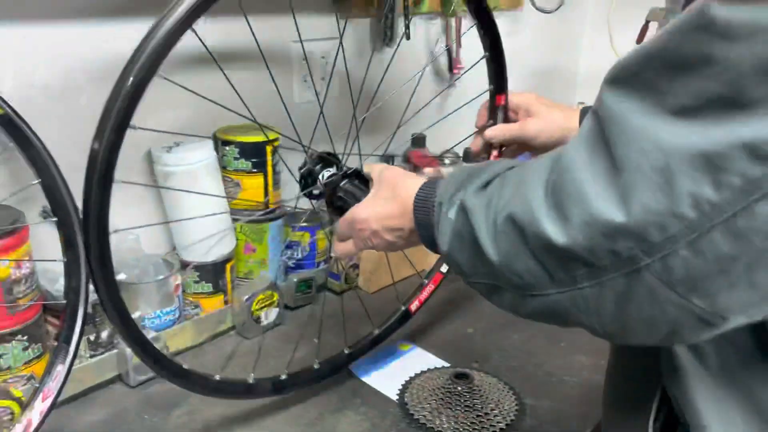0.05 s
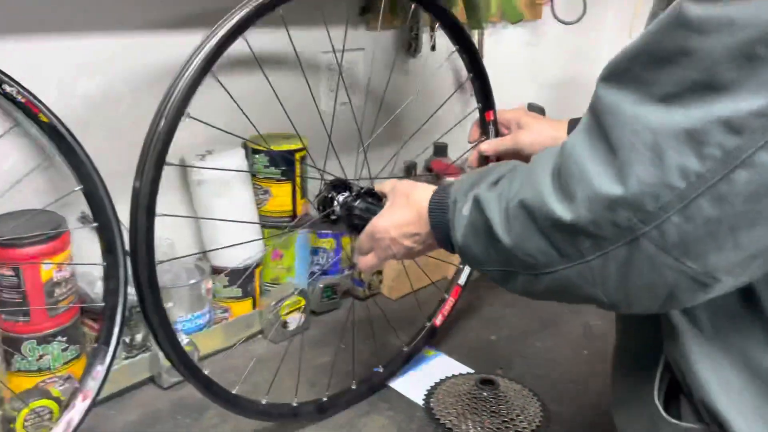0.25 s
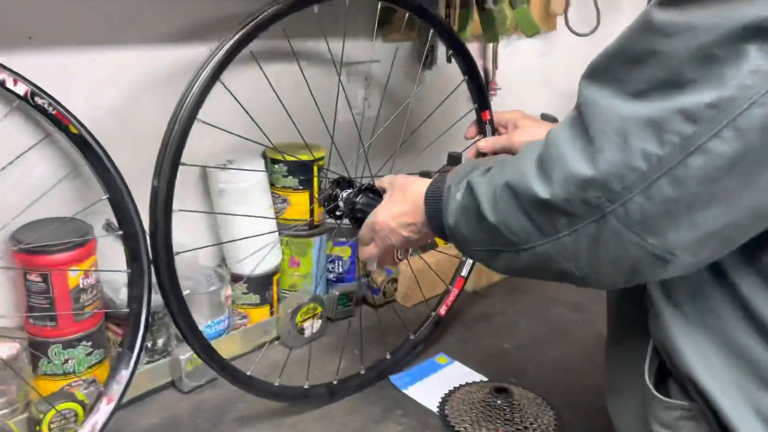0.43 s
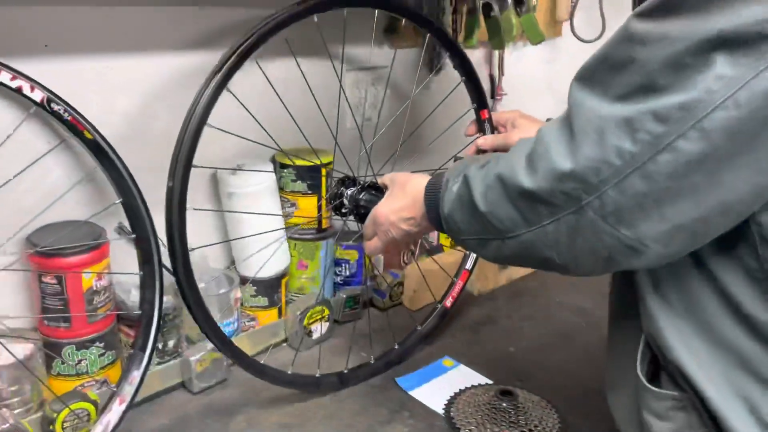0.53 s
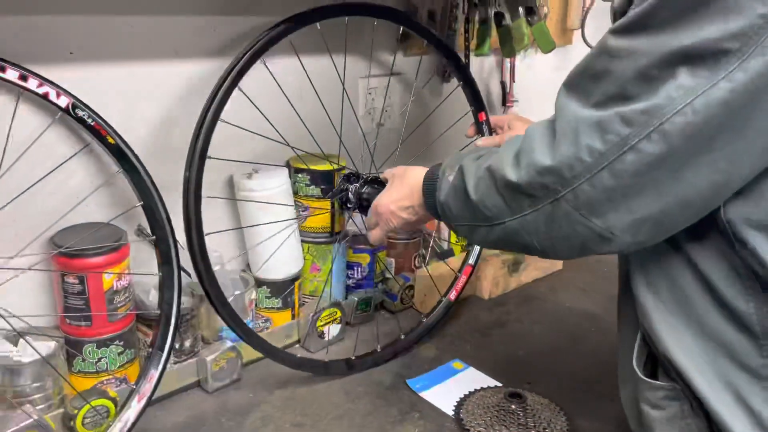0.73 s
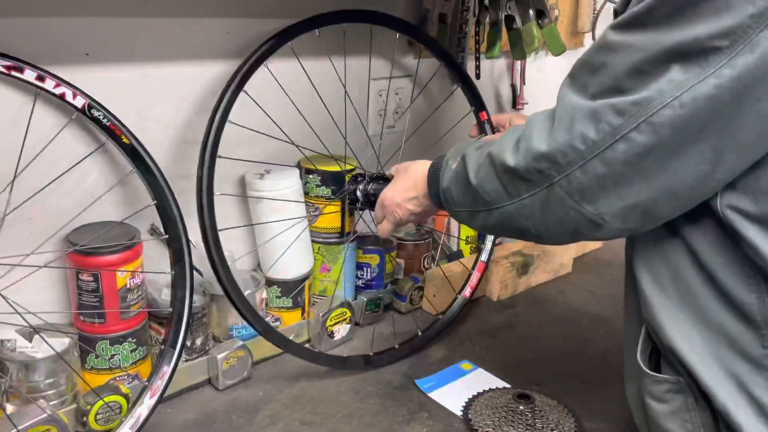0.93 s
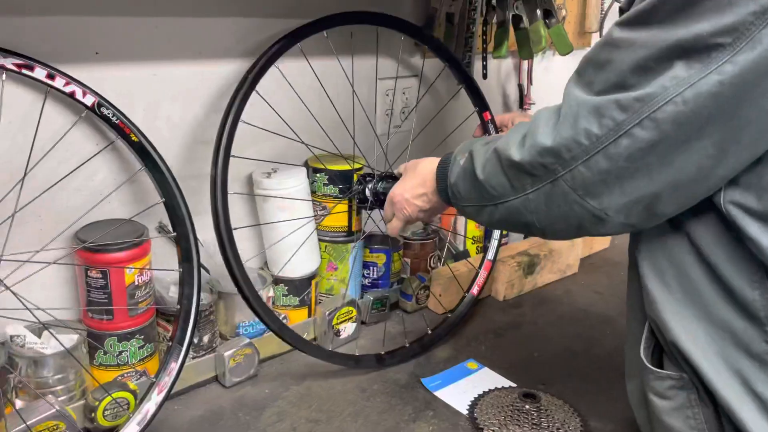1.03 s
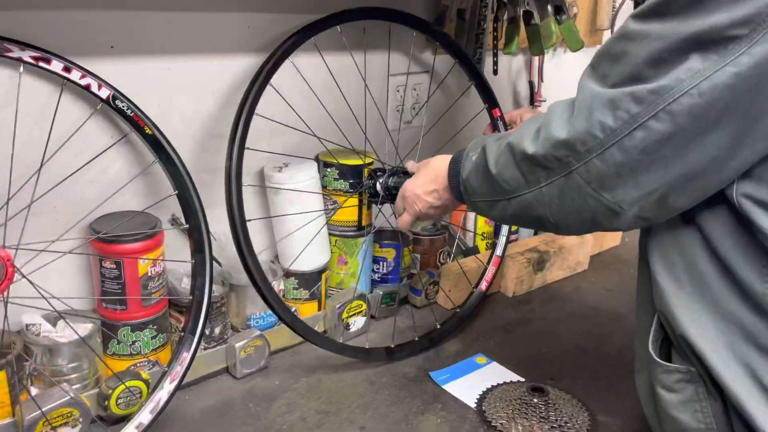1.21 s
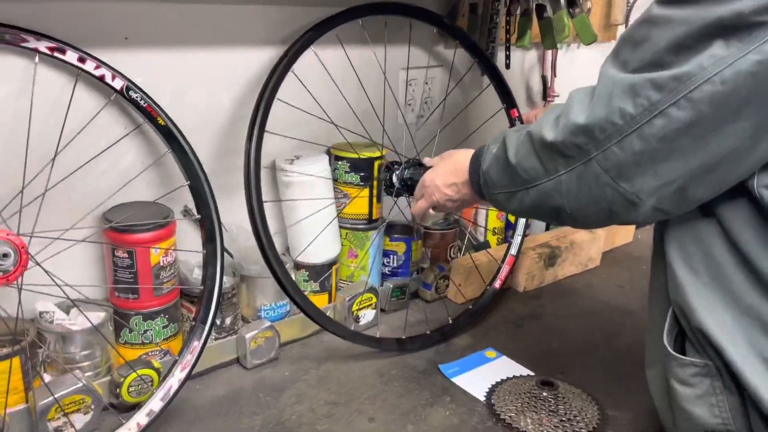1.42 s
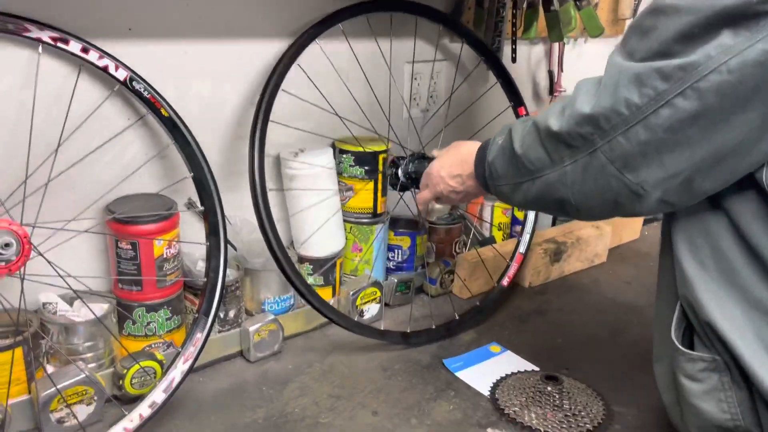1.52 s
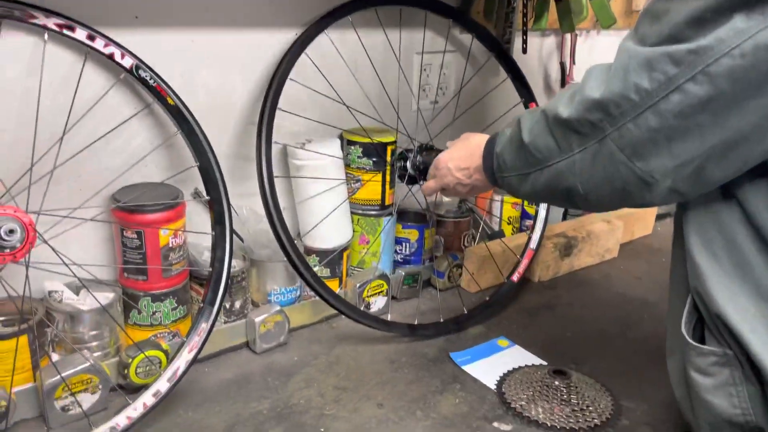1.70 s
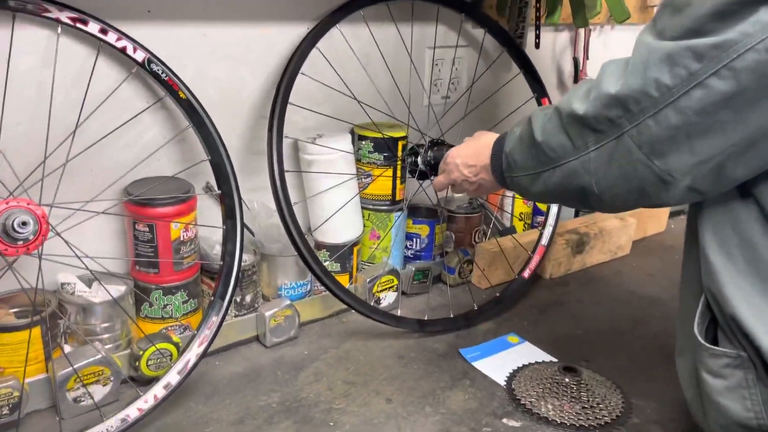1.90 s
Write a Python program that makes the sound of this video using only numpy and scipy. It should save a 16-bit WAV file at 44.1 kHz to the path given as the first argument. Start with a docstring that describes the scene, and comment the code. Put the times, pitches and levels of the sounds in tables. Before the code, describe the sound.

A bicycle wheel thuds loudly onto a cluttered workbench, bumps again more softly, scrapes and rattles along with small metal ticks, pauses, then gets a few light knocks; close microphone in a small, quiet workshop.

```python
"""In a small workshop, a sleeve rustles while a spoked bicycle wheel is lowered onto a cluttered workbench.
The wheel lands, bumps the bench again and is pushed along it; after a pause it is nudged and knocks lightly.
Fading tones make the booms, metal rings, low thuds and hums; shaped noise makes the clacks, cracks and rustle.
Thousands of random slips scrape the rim, and tiny pings chatter along with it.
A short room tail and quiet air surround it all."""
import sys
import numpy as np
from scipy import signal
from scipy.fft import rfft, irfft, next_fast_len
from scipy.io import wavfile
from scipy.ndimage import map_coordinates

SR = 44100
rng = np.random.default_rng(int(sys.argv[2]) if len(sys.argv) > 2 else 0)


def pcm_store(signal):
    """Save signal as 16-bit PCM."""
    levels = np.round(np.clip(np.atleast_2d(signal), -1, 1) * 32767)
    wavfile.write(sys.argv[1], SR, levels.astype(np.int16).T)


N = 85995  # length in samples

# In all tables and settings, T60 is the time in seconds to fade by 60 dB.
# Noise colours give relative levels only: the noise is brought to an even loudness afterwards.

# The rim knocks on the bench. Each row: start in seconds, boom level in dB, boom pitch as a ratio,
# boom lag in seconds, clack level in dB, crack level in dB.
RIM_KNOCKS = [(0.2274, -18.5, 1.7, 0.00052, -15.5, -50), (0.2339, -3.5, 1.0, 0, -15.5, -42),
              (0.5451, -12.5, 1.01, 0.0037, -27.5, -42.5), (0.922, -30, 0.89, 0, -65, -66),
              (0.967, -26, 1.05, 0.00077, -42.5, -53.5), (1.462, -31, 0.94, 0.0032, -58.5, -65),
              (1.512, -33, 0.43, 0, -40.5, -52.5), (1.5909, -44.5, 1.5, 0, -34, -43),
              (1.605, -26.5, 0.8, 0.011, -31, -50.5)]
# Low tones of the bench top. Each row: pitch in Hz before the knock's ratio, relative level in dB, T60 in seconds.
BENCH_MODES = [(61.6, -27.5, 0.34), (92.3, -11, 0.16), (122.65, 4, 0.13), (189, -18, 0.12),
               (260, -14, 0.18), (316, -17, 0.24), (406.6, -19, 0.18), (844.6, -35, 0.11),
               (901, -19, 0.055), (958.7, -22, 0.049), (1579, -34.5, 0.22)]
# Colour of the clack of rim and clutter. Each row: frequency in Hz, relative level in dB per Hz.
CLACK_COLOUR = [(30, -21.5), (70, -9), (150, 2.5), (380, -0.5), (520, -10.5), (950, -10), (1700, -19),
                (2600, -25.5), (4500, -30.5), (8000, -68.5), (16000, -88)]
# Peaks in the clack. Each row: frequency in Hz, width in Hz, relative level in dB.
CLACK_RESONANCES = [(421.5, 30, -2), (919, 33, 0), (1597, 90, 5), (1860, 90, -2.5)]
# How long the clack lasts. Each row: frequency in Hz, T60 in seconds.
CLACK_FADE = [(60, 0.15), (300, 0.16), (1000, 0.13), (3000, 0.14), (12000, 0.067)]
# Colour of the sharp crack. Each row: frequency in Hz, relative level in dB per Hz.
CRACK_COLOUR = [(300, -58), (1500, -6), (3500, 1), (6500, 0), (8500, -0.5), (12500, 0), (16000, -19)]
# Resonances of the rim and hub. Each row: frequency in Hz, width in Hz, level in dB over the plain noise.
RIM_RESONANCES = [(642, 8.3, -5.5), (1298, 63, 7.5), (1805, 53, 12.5), (1967, 22, 12), (2520, 98, 3.5),
                  (2870, 71.6, 4), (3107, 25, 10), (3467, 50, -7.5), (3760, 270, -1.5), (4320, 139.4, 1),
                  (4970, 30, 8), (6320, 30, 13), (6820, 50, 7.5)]
# The rim scrapes along the bench. Each row: time in seconds, level in dB.
SLIDE_LEVEL = [(0.2, -74.5), (0.37, -60.5), (0.54, -55.5), (0.56, -39.5), (0.635, -36.5), (0.66, -41),
               (0.72, -42.5), (0.85, -48), (0.9, -45), (0.99, -46.5), (1.04, -57.5), (1.13, -106),
               (1.31, -84), (1.36, -57), (1.39, -61), (1.42, -54), (1.47, -49), (1.5, -54), (1.58, -55.5),
               (1.66, -57), (1.78, -90)]
# Colour of the scrape. Each row: frequency in Hz, relative level in dB per Hz.
SCRAPE_COLOUR = [(200, 6.5), (400, 11.5), (700, 4), (1800, -6.5), (3500, -6.5), (6500, -14), (8500, -10),
                 (10500, -10), (12800, -12), (16000, -26)]
# The bench rumbles under the moving wheel. Each row: time in seconds, level in dB.
RUMBLE_LEVEL = [(0.24, -100), (0.3, -41), (0.4, -42), (0.52, -57.5), (0.6, -30), (0.72, -32), (0.86, -48),
                (0.99, -35), (1.1, -55.5), (1.3, -66), (1.39, -61), (1.46, -43), (1.57, -51.5),
                (1.63, -46.5), (1.72, -55), (1.95, -67)]
# Colour of the rumble. Each row: frequency in Hz, relative level in dB per Hz.
RUMBLE_COLOUR = [(25, -28), (55, 4), (75, -2.5), (120, 5), (170, -4), (280, -9), (400, -11.5), (520, -25.5),
                 (1000, -53)]
# Small metal parts tick. Each row: start in seconds, level in dB, T60 of the hiss in seconds.
METAL_TICKS = [(0.546, -33, 0.028), (0.5777, -41.5, 0.11), (0.5926, -38.5, 0.035), (0.628, -43, 0.028),
               (0.672, -45.5, 0.077), (0.7178, -37.5, .06), (0.7632, -45.5, 0.21), (0.8994, -33, 0.073),
               (0.9656, -52, 0.11), (1.458, -51, 0.091), (1.514, -57.5, .08), (1.5932, -45, 0.081)]
# Tones of the small metal parts. Each row: pitch in Hz, relative level in dB, T60 in seconds.
METAL_MODES = [(3085, -9, .2), (3693, -9, .14), (4945, -8, .17), (6233, -3, .13), (6815, -11, .13),
               (9426, -11, .14), (11950, -5, .09), (12930, -2, .09), (13460, 0, .08), (13840, -1, .09)]
# Colour of the hiss in a tick. Each row: frequency in Hz, relative level in dB per Hz.
TICK_COLOUR = [(1000, -25), (2500, 1), (4000, 2), (8000, -8), (10500, -2.5), (13300, 2.5), (16000, -9)]
# Low thuds of the swaying bench and hums of the wheel and spokes.
# Each row: start in seconds, pitch in Hz, level in dB, T60 in seconds.
THUDS_AND_HUMS = [(0.236, 343, -34.5, 0.63), (0.551, 264.5, -36, 0.41), (0.971, 303, -51, 1.17),
                  (1.001, 421.7, -57.5, 1.31), (1.01, 42.7, -33.5, 0.45), (1.601, 84.6, -41.5, 0.67),
                  (1.601, 54.7, -41.5, 1.3), (1.621, 284, -55, 1.6), (1.6, 414, -51.5, 0.45)]
# The sleeve rustles while the wheel is lowered. Each row: time in seconds, level in dB.
SLEEVE_LEVEL = [(0, -66), (0.08, -63.5), (0.2, -61.5), (0.3, -76.5)]
# Colour of the cloth. Each row: frequency in Hz, relative level in dB per Hz.
CLOTH_COLOUR = [(150, 9), (400, -13), (540, 2), (800, -1), (2200, -3.5), (3800, -13.5), (7000, -21),
                (8500, -28.5), (12000, -37), (16000, -37)]
# Colour of the tick as the grip shifts. Each row: frequency in Hz, relative level in dB per Hz.
HAND_TICK_COLOUR = [(1000, -20), (2800, -19.5), (3800, -4.5), (5000, -16.5), (9000, -32)]
# Colour of the room's tail. Each row: frequency in Hz, relative level in dB per Hz.
TAIL_COLOUR = [(150, -57.5), (450, 6), (1000, 2.5), (4000, 1.5), (14000, -9.5)]
# Colour of the room air. Each row: frequency in Hz, relative level in dB per Hz.
AIR_COLOUR = [(25, -1.5), (60, 6.5), (110, -6.5), (180, -17.5), (330, -2), (700, -20.5), (2000, -24),
              (5000, -26), (8500, -23.5), (12500, -17.5), (16000, -62.5)]
# Stereo width. Each row: frequency in Hz, side level over middle level in dB.
STEREO_WIDTH = [(60, -16), (125, -11.5), (250, -8), (500, -6), (1000, -4), (4000, -2), (7000, -0.5),
                (8700, 20), (10200, 0), (11500, 3.5), (16000, -98)]
# Lean of the whole scene. Each row: frequency in Hz, left level over right level in dB.
LEFT_LEAN = [(30, -1), (60, 0.5), (125, 2.5), (250, 2), (500, 2), (1000, 1.5), (2500, 0.66), (12000, -0.5)]

BOOM_RISE_S, CLACK_RISE_S, CRACK_RISE_S, CRACK_T60 = 0.012, 0.0033, 0.00033, 0.18
GRAINS_PER_S, GRAIN_SPREAD_DB, SCRAPE_ROUGH_DB = 5000, -1, 0.5
CHATTER_DB, CHATTER_SPREAD_DB, CHATTER_T60 = -12, 4.5, 0.065  # level is relative to the slide
CHATTER_LOW_HZ, CHATTER_HIGH_HZ = 895, 5550
TICK_RING_DB, TICK_NOISE_DB = -10.5, -2  # relative to each tick's level
HUM_RISE_S, HUM_WAVER_DB = 0.0059, 2  # for the thuds as well
HAND_TICK_S, HAND_TICK_DB = 0.088, -58.5
ROOM_T60, ROOM_DB, AIR_DB = 0.29, -12, -73.5
LEFT_LEAD_S = 0.00007  # for low tones; it shrinks as pitch rises
LOW_CUT_HZ, TOP_HZ = 47, 15900


def amp(db):
    """Turn decibels into a gain."""
    return 10 ** (np.asarray(db) / 20)


def unit(x):
    """Scale a sound to an average (rms) strength of 1."""
    return x / np.sqrt(np.mean(x ** 2) + 1e-20)


def along(points, hz):
    """Read a table of (Hz, value) at any frequency, on a log axis."""
    table_hz, values = np.transpose(points)
    return np.interp(np.log(hz + 1), np.log(table_hz + 1), values)


def curve(rows):
    """Join (seconds, value) points into one value per sample."""
    return np.interp(np.arange(N) / SR, *np.transpose(rows))


def since(s):
    """Seconds passed after a moment, zero before it."""
    return np.maximum(np.arange(N) / SR - s, 0)


def rise(t, seconds):
    """A gain that climbs smoothly from 0 towards 1."""
    return 1 - np.exp(-t / seconds)


def wobble(rate):
    """A smooth random curve through `rate` random points a second."""
    knots = rng.standard_normal(int(N * rate / SR) + 4)
    return map_coordinates(knots, [np.arange(N) * rate / SR])


def filtered(x, response):
    """Reshape a sound by a gain for each frequency."""
    m = next_fast_len(N + SR // 2)
    spectrum = rfft(x, m) * response(np.fft.rfftfreq(m, 1 / SR))
    return irfft(spectrum, m)[..., :N]


def noise(colour, drive=1, peaks=()):
    """Coloured stereo noise of rms 1: a resonance lifts each peak, and the width table spreads it."""
    def response(hz):
        turn = np.arctan(amp(along(STEREO_WIDTH, hz)))
        body = 1
        for centre, width, db in peaks:
            body = body + amp(db) / (1 + 2j * (hz - centre) / width)
        return body * amp(along(colour, hz)) * np.array([np.cos(turn), np.sin(turn)])
    mid, side = filtered(drive * rng.standard_normal((2, N)), response)
    return unit(np.array([mid + side, mid - side]))


def boom(s, pitch):
    """The bench top swells into its low tones, which then fade at their own speeds."""
    t = since(s)
    swell = np.sin(np.pi / 2 * np.minimum(t / BOOM_RISE_S, 1)) ** 2
    tones = 0
    for hz, db, t60 in BENCH_MODES:
        tones = tones + amp(db - 60 * t / t60) * np.sin(2 * np.pi * hz * pitch * t)
    return swell * tones


def clack(s):
    """Rim and clutter as resonant noise, with its own fading time at each frequency."""
    hz, t, bands = signal.stft(noise(CLACK_COLOUR, peaks=CLACK_RESONANCES), SR, nperseg=256)
    fade = amp(-60 * np.maximum(t - s, 0) / along(CLACK_FADE, hz)[:, None])
    faded = signal.istft(bands * fade, SR, nperseg=256)[1][:, :N]
    return faded * rise(since(s), CLACK_RISE_S)


def crack(s):
    """A sharp burst of bright noise through the resonances of the rim."""
    t = since(s)
    fade = amp(-60 * t / CRACK_T60)
    return noise(CRACK_COLOUR, peaks=RIM_RESONANCES) * fade * rise(t, CRACK_RISE_S)


def knocks():
    """Each contact booms in the bench, clacks and cracks."""
    out = np.zeros((2, N))
    for s, boom_db, pitch, lag, clack_db, crack_db in RIM_KNOCKS:
        sharp = crack(s)
        out += amp(boom_db) * boom(s + lag, pitch) + amp(clack_db) * clack(s) + amp(crack_db) * sharp
    return out


def slide():
    """Dense tiny slips sound the rim's resonances over the rumble of the bench."""
    is_slip = rng.random(N) < GRAINS_PER_S / SR
    slips = is_slip * amp(GRAIN_SPREAD_DB * rng.standard_normal(N))
    level = amp(curve(SLIDE_LEVEL) + SCRAPE_ROUGH_DB * wobble(68))
    scrape = noise(SCRAPE_COLOUR, slips, RIM_RESONANCES) * level
    rumble = noise(RUMBLE_COLOUR) * amp(curve(RUMBLE_LEVEL))
    return scrape + rumble


def chatter(count=420):
    """Tiny contacts ping at chance times and pitches, their level following the slide."""
    out = np.zeros((2, N + SR))
    t = np.arange(SR // 10) / SR
    chances = np.column_stack([rng.random((count, 4)), rng.standard_normal(count)])
    for when, height, left, right, size in chances:
        hz = CHATTER_LOW_HZ * (CHATTER_HIGH_HZ / CHATTER_LOW_HZ) ** height
        phases = np.array([[left], [right]])  # in turns, one for each ear
        ping = np.sin(2 * np.pi * (hz * t + phases)) * rise(t, 0.001)
        first = int(when * N)
        out[:, first:first + len(t)] += amp(CHATTER_SPREAD_DB * size - 60 * t / CHATTER_T60) * ping
    return out[:, :N] * amp(curve(SLIDE_LEVEL) + CHATTER_DB)


def ring(modes, t):
    """Struck metal sounds as fading tones, their phases set apart between left and right."""
    out = np.zeros((2, N))
    for hz, db, t60 in modes:
        apart = np.arctan(amp(along(STEREO_WIDTH, hz))) * np.array([[1], [-1]])
        level = amp(db + rng.standard_normal() * 2 - 60 * t / t60)  # strength varies by chance
        out += level * np.sin(2 * np.pi * (hz * t + rng.random()) + apart)
    return out * (t > 0)


def ticks():
    """Small metal parts touch with a short bright hiss and ring."""
    out = np.zeros((2, N))
    for s, db, t60 in METAL_TICKS:
        t = since(s)
        hiss = noise(TICK_COLOUR) * amp(TICK_NOISE_DB - 60 * t / t60)
        metal = amp(TICK_RING_DB) * ring(METAL_MODES, t)
        out += amp(db) * rise(t, 0.00053) * (hiss + metal)
    return out


def thuds_and_hums():
    """Low thuds of the swaying bench and hums of the wheel and spokes, as fading tones that waver
    a little in level and phase."""
    out = np.zeros(N)
    for s, hz, db, t60 in THUDS_AND_HUMS:
        t = since(s)
        level = amp(db - 60 * t / t60 + HUM_WAVER_DB * wobble(20))
        out += level * rise(t, HUM_RISE_S) * np.sin(2 * np.pi * hz * t + 0.3 * wobble(22))
    return out


def sleeve():
    """Soft cloth friction as noise, with one faint tick as the grip shifts."""
    t = since(HAND_TICK_S)
    rustle = noise(CLOTH_COLOUR) * amp(curve(SLEEVE_LEVEL))
    grip_tick = noise(HAND_TICK_COLOUR) * amp(HAND_TICK_DB - 60 * t / 0.053) * (t > 0)
    return rustle + grip_tick


def workshop(x):
    """The near walls answer with a short tail of fading noise that has little bass."""
    fade = amp(-60 * since(0.0083) / ROOM_T60)
    tail = noise(TAIL_COLOUR) * fade * rise(since(0.00311), 0.001)
    mono = x.mean(axis=0)[None]
    return signal.fftconvolve(mono, tail / np.linalg.norm(tail[0]), axes=1)[:, :N]


def air():
    """Steady, quiet room air as coloured noise."""
    return amp(AIR_DB) * noise(AIR_COLOUR)


def scene():
    """Mix all contacts, their room tail and the air, then lean it by small level and time differences."""
    contacts = knocks() + thuds_and_hums() + ticks() + slide() + chatter() + sleeve()
    room = contacts + amp(ROOM_DB) * workshop(contacts) + air()
    sides = np.array([[0.5], [-0.5]])  # half of each difference goes to either side

    def lean(hz):
        lead = 2 * np.pi * hz * LEFT_LEAD_S / (1 + (hz / 2000) ** 2)
        return amp(along(LEFT_LEAN, hz) * sides) * np.exp(1j * lead * sides)
    return filtered(room, lean)


def record(dry):
    """Weaken the deepest bass and remove everything above the top frequency."""
    low_cut = signal.butter(2, LOW_CUT_HZ, "high", fs=SR, output="sos")
    thinned = signal.sosfilt(low_cut, dry)
    return filtered(thinned, lambda hz: hz < TOP_HZ)


dry = scene()
out = record(dry)
pcm_store(out)
```